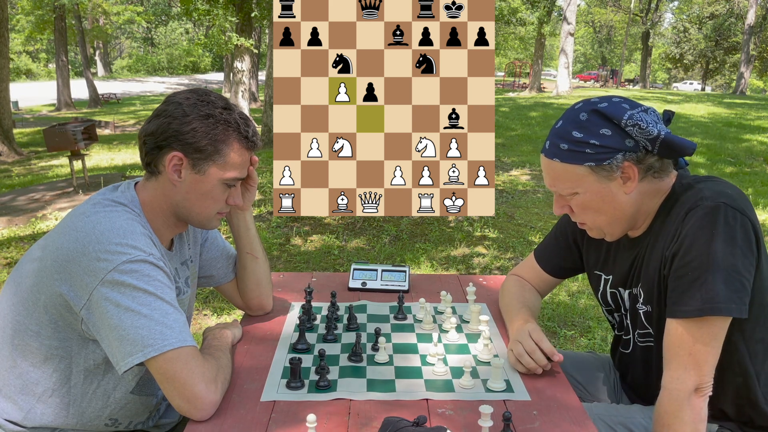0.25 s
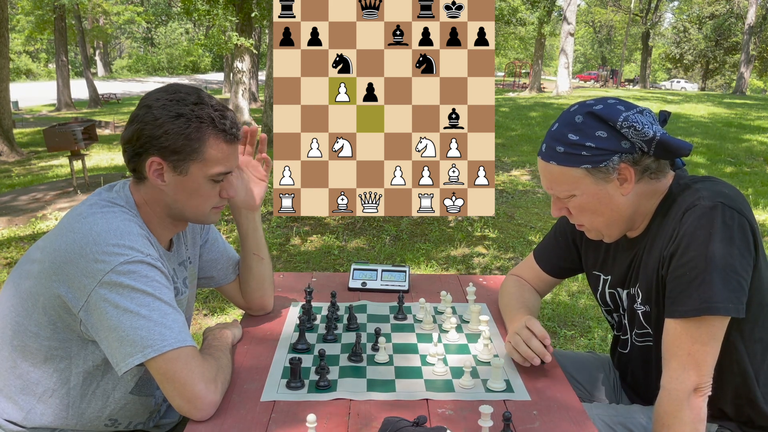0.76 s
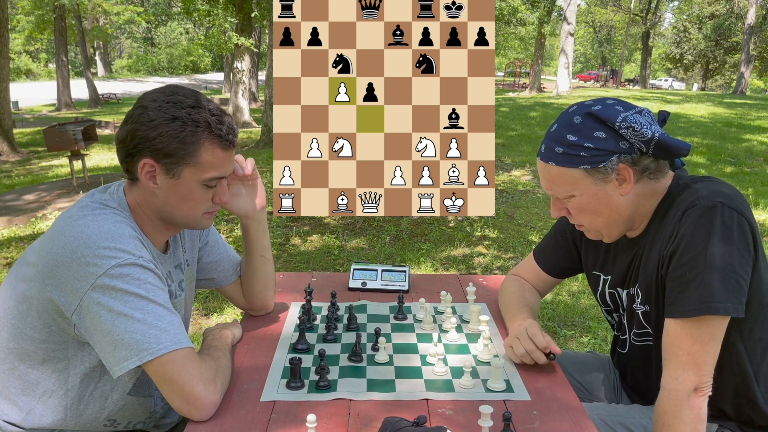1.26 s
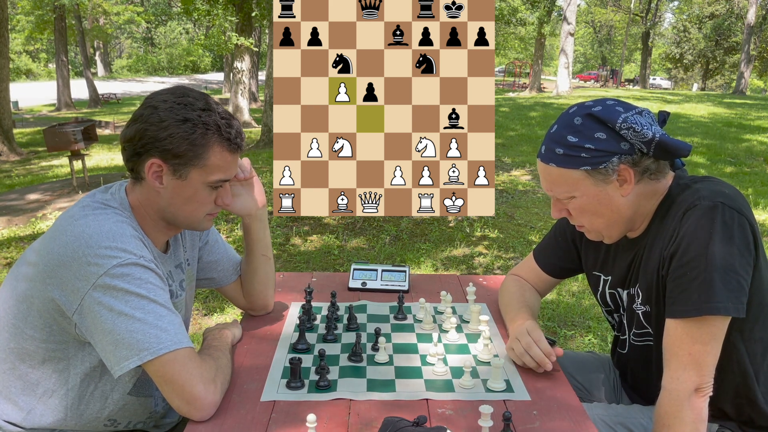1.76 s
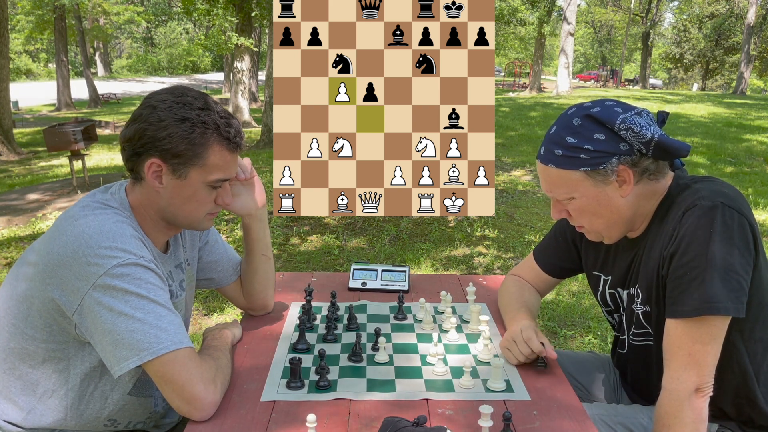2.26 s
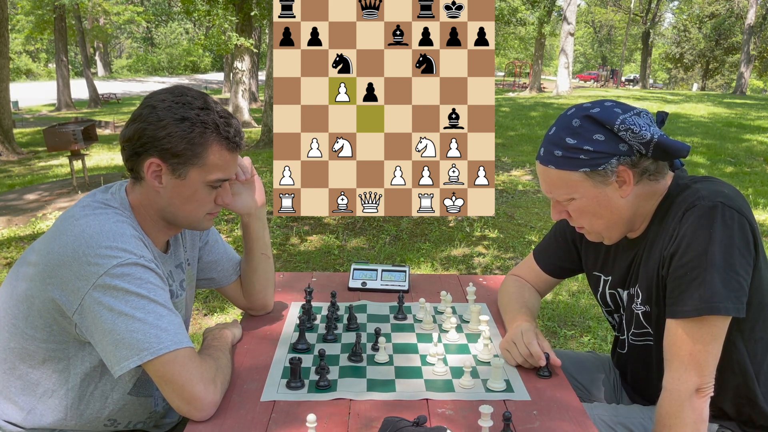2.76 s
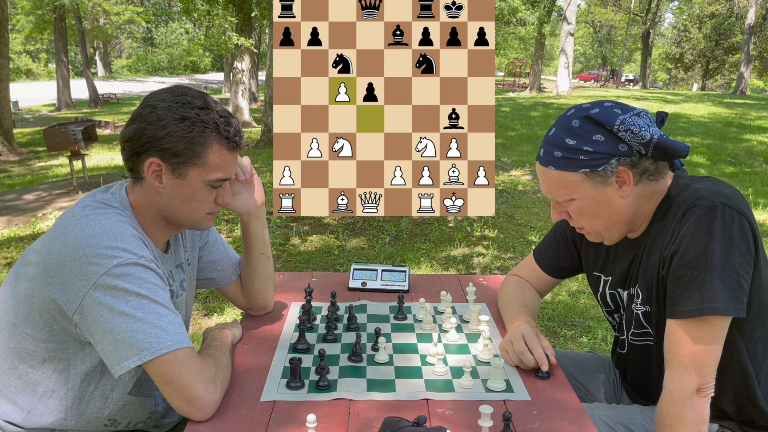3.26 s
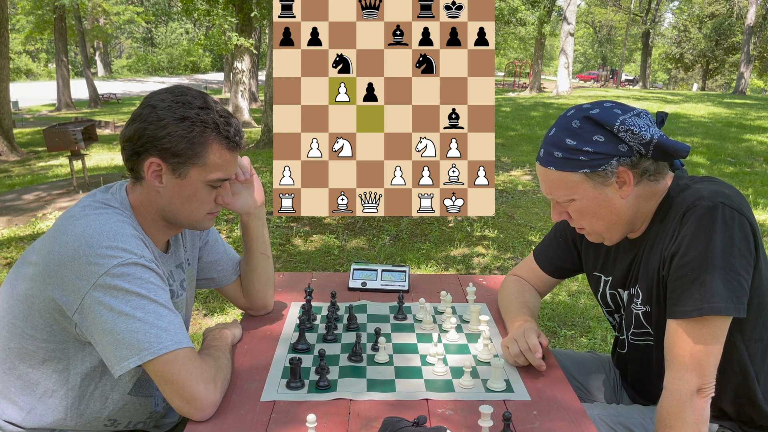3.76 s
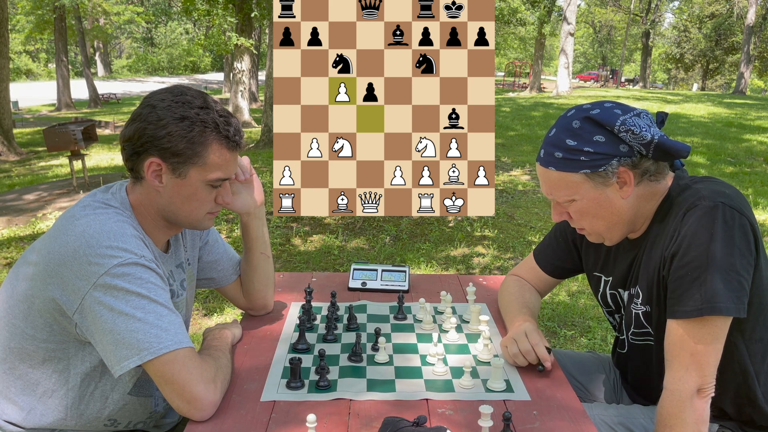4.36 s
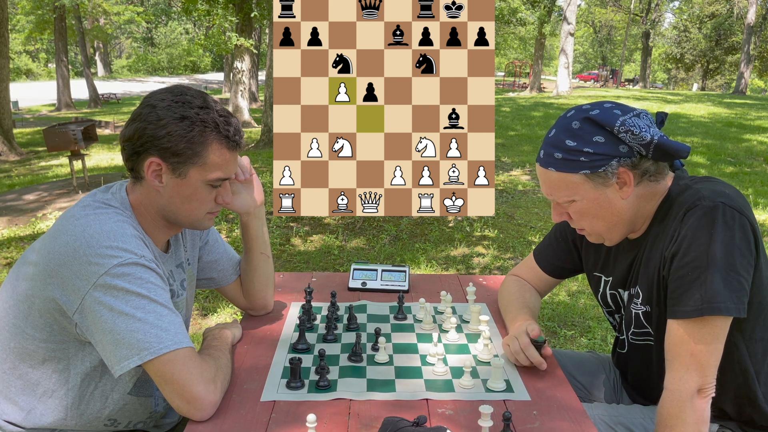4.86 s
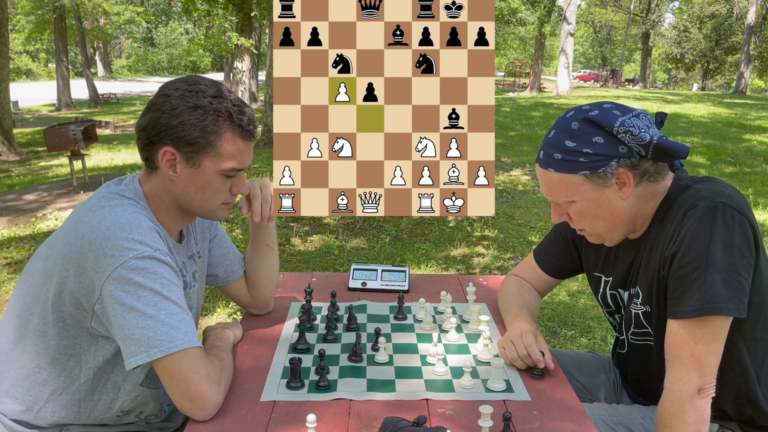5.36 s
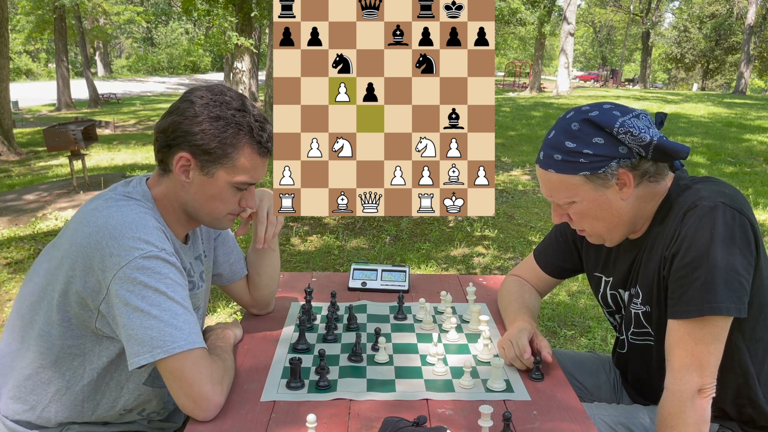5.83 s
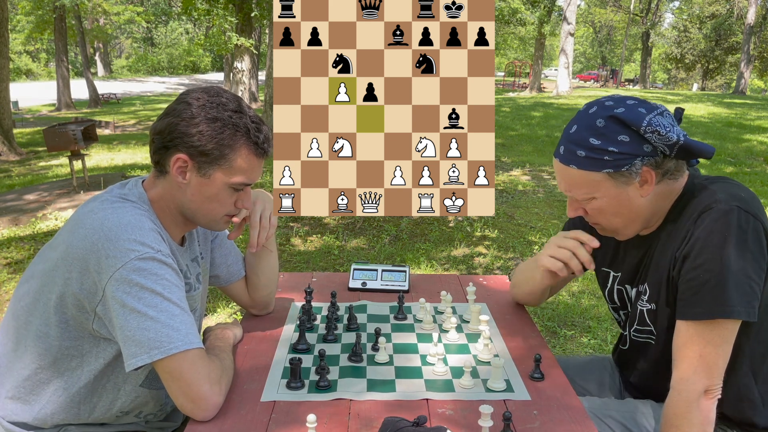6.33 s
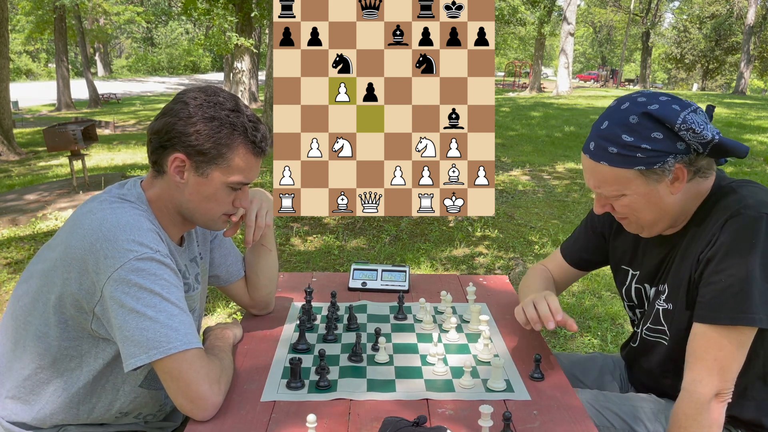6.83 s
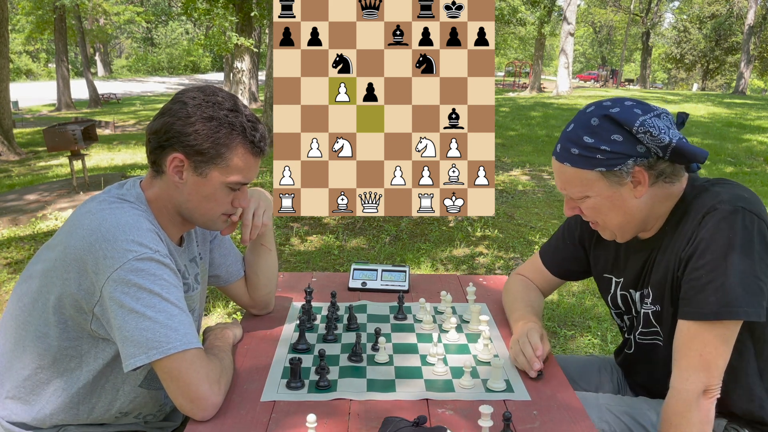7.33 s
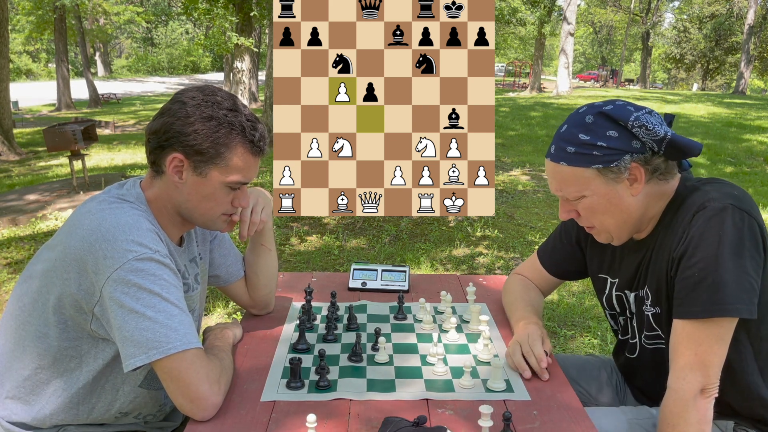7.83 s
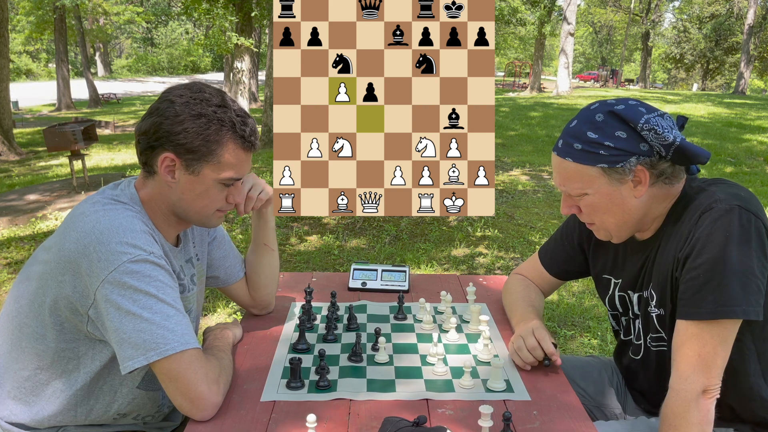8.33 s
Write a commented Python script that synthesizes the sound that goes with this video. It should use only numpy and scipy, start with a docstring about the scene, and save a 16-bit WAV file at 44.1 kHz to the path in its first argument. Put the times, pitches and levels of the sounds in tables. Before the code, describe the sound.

A calm outdoor park heard from beside a wooden table. Low wind rumble and distant traffic wash run throughout, with a low engine drone and thin, unsteady whine gradually fading. Bright, short bird whistles, falling, arching and trilled, are prominent from 0 to 1.7 s, lightly echoed by trees. At 0.54 s a hard plastic piece strikes the planks in a crisp, rapid double clack, the loudest event. Tiny ticks follow at 0.9, 1.6 and 2 s, the last with a faint bump. From 2.9 to 5 s a far bird repeats a falling slur about twice a second. A softer, woodier double clack comes at 5.32 s, surrounded by faint ticks. Very light finger brushes occur around 3.5, 6.2-6.6 and 7.4 s; dull bumps land at 7.04 and 7.34 s. Leaves hiss gently around 7.5 s amid quick, faint twittering, then sparse distant calls and tiny ticks to the end.

```python
"""Chess in the park

A player toys with a captured plastic piece at a wooden table. Twice it clacks on the planks:
each clack is a row of quick contacts that make the wood ring. Soft bumps ring the same wood.
In the fingers the piece ticks (short noise and ringing) and skin brushes cloth and wood (grainy noise).
Birds sing gliding tones, partly echoed by the trees. Shaped noise makes wind, far traffic and leaves.
A distant engine adds a drone of narrow noise and a thin, unsteady whine."""
import sys
import numpy as np
from scipy import signal
from scipy.fft import rfft, irfft
from scipy.io import wavfile

SR = 44100
rng = np.random.default_rng(int(sys.argv[2]) if len(sys.argv) > 2 else 0)


def master_out(mix):
    """Clip the mix to full scale and print it as 16-bit PCM to the path in sys.argv[1]."""
    frames = np.transpose(np.atleast_2d(mix))
    ceiling = np.clip(frames, -1, 1)
    pcm = np.round(ceiling * 32767).astype(np.int16)
    wavfile.write(sys.argv[1], SR, pcm)


N = 378819
TIME = np.arange(N) / SR

# how the planks and the piece ring when struck, at two spots on the table:
# (frequency [Hz], time to fall by 60 dB [s], relative level at spot 0 [dB], relative level at spot 1 [dB])
WOOD_MODES = [(364, 0.13, -24, -15.5), (433, 0.058, -16, -11), (533, 0.093, -11.5, -18),
              (711, 0.12, -21, -21), (760, 0.074, -45, -21), (975, 0.058, -16.5, -5),
              (1130, 0.029, -17, -19), (1140, 0.015, -34, -7), (1329, 0.026, 0.5, 0),
              (1650, .011, -25, -11.5), (1990, 0.013, -1.5, -7), (2000, 0.011, -18, -13.5),
              (2440, 0.018, -16, -16), (2460, 0.0066, 4.5, -24), (2990, 0.035, -8.5, -25),
              (4450, 0.013, -24, -32), (5100, 0.0035, -4.5, -16), (6000, 0.0099, -20.5, -23),
              (8540, 0.011, -16, -9), (12750, 0.0099, -7.5, -3)]
# the piece lands in two steps, rim then base:
# (time [s], relative level [dB], brightness [Hz], spot on the table [0 or 1], time between bounces [s])
CLACKS = [(.5440, -18, 6550, 0, 0.001798), (.55083, -18.5, 2570, 0, 0.001504),
          (5.3187, -22.5, 2830, 1, 0.00219), (5.3234, -25, 2130, 1, 0.0017)]
# soft bumps of hand and piece: (time [s], relative level [dB], brightness [Hz], spot on the table [0 or 1])
BUMPS = [(1.978, -50, 2000, 0), (5.224, -55, 2000, 1), (7.041, -35, 340, 1), (7.344, -38, 400, 0)]
BOUNCE_LOSS_DB, BOUNCE_DULLING = 3, 0.5  # each bounce is weaker and duller than the last
THUD_HZ, THUD_T60_S, THUD_DB = 107, 0.02, -5  # the whole table top gives under a blow

# how the held piece rings: (frequency [Hz], time to fall by 60 dB [s], relative level [dB])
PIECE_MODES = [(3510, 0.02, -7.5), (4080, 0.0053, -2), (8450, 0.02, -37)]
# small ticks of the piece in the fingers: (time [s], relative level [dB])
TICKS = [(.92, -47.5), (1.56, -45), (1.9793, -42), (4.2784, -56.5), (4.3798, -57), (5.2268, -48),
         (5.3406, -44.5), (8.2057, -53), (8.3706, -54)]
# fingers brushing cloth and wood: (time [s], length [s])
RUBS = [(3.546, 0.068), (6.165, 0.079), (6.283, 0.039), (6.5, 0.15), (7.328, .055), (7.473, .14)]
RUB_DB = -77

# pitch curve of each bird syllable at even steps: (multiple of the note's pitch [no unit])
PLUNGE_SHAPE = [1.13, 1.07, 1, .85, .68]
SWOOP_SHAPE = [1.2, 1.09, 1, .965, .955]
ARCH_SHAPE = [.79, .92, 1, 1, 1, .98, .8]
FLICK_SHAPE = [.87, 0.99, 1.11]
BURR_SHAPE = [1.06, 0.96, 0.89]
HOOK_SHAPE = [.96, 1, 1, .9, .77]
PIPE_SHAPE = [.975, 1, 1.015]
SLUR_SHAPE = [1.25, 1, .8]
# length of each syllable, in seconds
PLUNGE_S, SWOOP_S, ARCH_S, FLICK_S = 0.074, 0.1, 0.06, 0.02
BURR_S, HOOK_S, PIPE_S, SLUR_S = 0.12, 0.075, 0.085, 0.125
# whistles that fall ever faster: (time [s], pitch [Hz], relative level [dB])
PLUNGES = [(.166, 3256, -46), (1.15, 3280, -44.5), (7.003, 3030, -59.5), (7.487, 3250, -61.5)]
# whistles that fall and level out: (time [s], pitch [Hz], relative level [dB])
SWOOPS = [(1.626, 2903, -45.5), (2.715, 8440, -77.5), (4.155, 2150, -68), (5.32, 2880, -60.5),
          (5.475, 3440, -67.5), (8.24, 3450, -64), (8.38, 2890, -66), (8.47, 4180, -68.5)]
# whistles that rise, hold and drop: (time [s], pitch [Hz], relative level [dB])
ARCHES = [(.526, 3434, -44.5), (.591, 3520, -47.5)]
# quick upward flicks: (time [s], pitch [Hz], relative level [dB])
FLICKS = [(.511, 3100, -52.5), (1.49, 3400, -54.5), (1.511, 3110, -45)]
# low, trilled notes: (time [s], pitch [Hz], relative level [dB])
BURRS = [(.015, 2546, -54), (.997, 2610, -48.5), (1.5, 2513, -55.5)]
# whistles that hold, then hook down: (time [s], pitch [Hz], relative level [dB])
HOOKS = [(2.037, 4070, -63.5), (2.152, 3970, -68)]
# nearly level piping notes: (time [s], pitch [Hz], relative level [dB])
PIPES = [(.648, 2247, -56.5), (1.96, 4550, -67), (2.79, 2100, -67), (5.37, 8270, -74), (5.915, 2960, -69),
         (6.09, 2910, -66), (6.6, 2600, -65.5), (7.8, 2570, -64.5)]
# a far bird repeats one falling slur about twice a second: (time [s])
SLUR_TIMES = [2.884, 3.373, 3.9, 4.42, 4.99]
SLUR_HZ, SLUR_DB = 3795, -72
# a faint syllable comes from farther off, so less of it is heard directly:
# (level [dB], share of the direct sound kept [0 to 1])
DIRECT_BY_LEVEL = [(-69, .62), (-53, 0.91)]
BURR_TRILL_HZ, BURR_TRILL_DEPTH = 30.9, 0.056
FLUTTER_PITCH, FLUTTER_DB = 0.035, 4  # how much the pitch and level of a scattered note tremble

# colour of the park's air noise: (frequency [Hz], relative level per Hz [dB])
AIR = [(12, -24), (20, 7), (44, -4.5), (80, -1), (153, -10), (213, -13.5), (252, -22), (491, -24),
       (565, -24.5), (631, -21), (1070, -22.5), (2210, -31.5), (3450, -35.5), (7310, -51), (15500, -57)]
AIR_DB = -53.5
# swell of the wind rumble, before a small trim and waver: (time [s], level [dB])
WIND = [(0.0, -50), (1.22, -52.5), (3.25, -53.5), (3.61, -53), (5.98, -54), (8.59, -53)]
# wash of far traffic, before a small trim and waver: (time [s], level [dB])
TRAFFIC = [(0.0, -59.5), (0.96, -58), (2.2, -59), (4.06, -62.5), (8.59, -60.5)]
LEAVES_DB, GUST_AT_S, GUST_WIDTH_S, GUST_DB = -1, 7.55, 0.39, 6.5  # one gust stirs the leaves

# middle pitch of the far engine's whine, which sinks and then holds: (time [s], pitch [Hz])
WHINE = [(0.7, 685.7), (3.75, 646.5), (4.2, 644)]
WHINE_DB, WHINE_FADE_DB, WHINE_FADE_S = -65.5, 9.5, 1.7  # the whine settles to a lower level
DRONE_DB, DRONE_FADE_DB_PER_S = -54.5, 1.5

TOP_HZ = 15700  # upper limit of the treble


def undb(db):
    """Turn decibels into a gain."""
    return 10 ** (np.asarray(db) / 20)


def unit(x):
    """Scale to an average (rms) strength of 1."""
    return x / np.sqrt(np.mean(x ** 2))


def curves(table):
    """Draw straight lines through a timed table, one curve for each column after the time."""
    s, *columns = np.transpose(table)
    return [np.interp(TIME, s, column) for column in columns]


def add(track, s, sound):
    """Mix a sound into a track at time s."""
    i = max(int(s * SR), 0)
    track[i:i + len(sound)] += sound[:max(N - i, 0)]


def filtered(x, hz, kind, order=2):
    """Keep the low, middle or high part of a sound (Butterworth filter)."""
    edges_hz = np.minimum(hz, SR / 2 - 1)
    return signal.sosfilt(signal.butter(order, edges_hz, kind, fs=SR, output="sos"), x)


def noise(gain):
    """Noise of rms 1, coloured by gain(frequency)."""
    spectrum = rfft(rng.standard_normal(2 * 2 ** 18))
    hz = np.linspace(1, SR / 2, 2 ** 18 + 1)
    return unit(irfft(spectrum * gain(hz))[:N])


def walk(rate):
    """A random wander of rms 1, with about rate swings a second."""
    steps = 2 * rate * TIME
    return unit(np.interp(steps, np.arange(4096), rng.standard_normal(4096)))


def fade(t, t60):
    """Exponential decay that falls by 60 dB in t60 seconds."""
    return np.exp(-np.log(1000) * t / t60)


def ring(hz, t60, db):
    """The answer to one tap: a sum of sine tones that each die away."""
    t = TIME[:SR // 4]
    return sum(undb(d) * fade(t, life) * np.sin(2 * np.pi * f * t) for f, life, d in zip(hz, t60, db))


def trees(x, t60, delay):
    """Scattering among trunks and leaves: a noisy tail that builds up and dies away."""
    t = TIME[:SR]
    tail = rng.standard_normal(len(t)) * fade(t, t60) * (1 - np.exp(-t / delay))
    return signal.fftconvolve(x, tail / np.linalg.norm(tail))[:N]


def clacks():
    """Clacks and bumps ring the table; every contact excites the same modes, through its own dulling filter."""
    out = np.zeros(N)
    hz, t60, *spots = np.transpose(WOOD_MODES)
    thud = ring([THUD_HZ], [THUD_T60_S], [THUD_DB])
    frame = table_frame()
    answers = [ring(hz, t60, db) + thud + undb(-12) * frame for db in spots]
    contacts = [contact for clack in CLACKS for contact in chatter(*clack, count=3)]
    for s, db, bright_hz, spot in contacts + BUMPS:
        add(out, s, -undb(db) * filtered(answers[round(spot)], bright_hz, "low"))
    # open planks radiate little bass
    out = filtered(out, 276, "high", order=1)
    return out + undb(-31.5) * trees(out, t60=0.43, delay=0.025)


def chatter(s, db, bright_hz, spot, gap, count):
    """The contacts of one landing: a blow and its quick bounces, each weaker and duller."""
    return [(s + gap * k, db - BOUNCE_LOSS_DB * k, bright_hz / (1 + BOUNCE_DULLING * k), spot)
            for k in range(count)]


def table_frame():
    """The frame joins in a moment later; noise stands for its many weak, crowded resonances."""
    t = TIME[:SR // 4]
    crowd = unit(filtered(rng.standard_normal(len(t)), [300, 950], "band"))
    return crowd * fade(t, 0.079) * (1 - np.exp(-t / 0.0078))


def ticks():
    """Plastic ticks in the hand: a short crack of noise and the ring of the piece."""
    out, t = np.zeros(N), TIME[:SR // 4]
    piece = ring(*np.transpose(PIECE_MODES))
    for s, db in TICKS:
        crack = filtered(rng.standard_normal(len(t)), [900, 5000], "band", order=1) * fade(t, 0.0053)
        add(out, s, undb(db) * (crack / 2 + piece))
    return out


def rubs():
    """Brushing fingers: treble noise with a grainy level, swelling and sinking with each stroke."""
    out = np.zeros(N)
    brush = filtered(noise(np.ones_like), 4000, "high", order=1) * undb(2 * walk(120))
    for s, length in RUBS:
        stroke = np.sin(np.pi * np.clip((TIME - s) / length, 0, 1))
        out += undb(RUB_DB) * brush * stroke
    return out


def birds():
    """Gliding whistles; faint ones are more broken up and come more as echoes from the trees."""
    slurs = [(s, SLUR_HZ, SLUR_DB) for s in SLUR_TIMES]
    near, far = (sing(PLUNGES, PLUNGE_S, PLUNGE_SHAPE, direct=0.8)
                 + sing(SWOOPS, SWOOP_S, SWOOP_SHAPE, direct=0.83)
                 + sing(ARCHES, ARCH_S, ARCH_SHAPE, direct=0.72, swell=0.12)
                 + sing(FLICKS, FLICK_S, FLICK_SHAPE, direct=0.7)
                 + sing(BURRS, BURR_S, BURR_SHAPE, direct=0.52, trill=BURR_TRILL_DEPTH)
                 + sing(HOOKS, HOOK_S, HOOK_SHAPE, direct=0.54, swell=0.25)
                 + sing(PIPES, PIPE_S, PIPE_SHAPE, direct=0.83)
                 + sing(slurs, SLUR_S, SLUR_SHAPE, direct=0.41, swell=0.5))
    early_echo = trees(far, t60=0.2, delay=0.0035)
    late_echo = trees(near + far, t60=0.9, delay=0.0045)
    return 1.39 * near + 1.36 * early_echo + undb(-7.5) * late_echo


def sing(notes, length, shape, direct, trill=0, swell=1.0):
    """One kind of syllable at each note's pitch and level, as two tracks: heard directly, and scattered."""
    near, far = np.zeros((2, N))
    for s, hz, db in notes:
        share = np.clip(direct * np.interp(db, *np.transpose(DIRECT_BY_LEVEL)), 0, 1)
        buzz = 1.4 * (1 - share)
        note = undb(db) * whistle(length, hz * np.array(shape), buzz, trill, swell)
        add(near, s, share * note)
        add(far, s, (1 - share) * note)
    return np.array([near, far])


def whistle(length, glide_hz, buzz, trill=0, swell=0.97):
    """One gliding sine tone; buzz makes it flutter, trill adds small downward sweeps of pitch."""
    u = np.linspace(0, 1, int(length * SR))
    glide = np.interp(u, np.linspace(0, 1, len(glide_hz)), glide_hz)
    glide = glide * (1 - trill * signal.sawtooth(2 * np.pi * BURR_TRILL_HZ * length * u))
    # the flutter heads for a new random value 300 times a second
    flutter = np.interp(u * length * 300, np.arange(100), rng.uniform(-1.5, 1.5, 100))
    phase = 2 * np.pi * np.cumsum(glide * (1 + FLUTTER_PITCH * buzz * flutter)) / SR
    # a small swell starts and ends the note abruptly
    loudness = undb(FLUTTER_DB * buzz * flutter) * np.abs(np.sin(np.pi * u)) ** swell
    return loudness * np.sin(phase)


def chorus():
    """Birds deep in the park: scattered calls, a brief cluster of overlapping whistles and a quick, low twitter."""
    scattered = twitter(0, 8.5, db=-75, length=0.036, low_hz=2530, octaves=1.0, count=56)
    # the whistles crowd into a tenth of a second, placed from the last to the first
    cluster = twitter(5.8, 5.7, db=-74, length=0.042, low_hz=2940, octaves=0.49, count=14)
    quick = twitter(7.15, 7.85, db=-77.5, length=0.021, low_hz=2640, octaves=0.6, count=44)
    calls = scattered + cluster + quick
    return 0.5 * calls + 1.1 * trees(calls, t60=0.18, delay=0.0047)


def twitter(start, end, db, length, low_hz, octaves, count):
    """Faint chirps spread loosely between two times, random in pitch, length and glide; higher is weaker."""
    out = np.zeros(N)
    for k, (when, pitch, span, slope) in enumerate(rng.random((count, 4))):
        s = start + (end - start) * (k + when) / count
        hz = low_hz * 2 ** (octaves * pitch ** 2)
        glide_hz = hz * (1 + (slope - 0.4) * np.array([0.2, 0, -0.16]))
        add(out, s, undb(db - 4 * pitch) * whistle(length * (0.5 + span), glide_hz, 0.5))
    return out


def park():
    """One noise, coloured like outdoor air, is split by pitch into wind, traffic, leaves and a steady rest."""
    hz, db = np.transpose(AIR)
    air = undb(AIR_DB) * noise(lambda f: undb(np.interp(np.log(f), np.log(hz), db)))
    low, middle, high = [below(air, edge_hz) for edge_hz in (220, 2400, 8000)]
    return wind(low) + traffic(middle - low) + leaves(high - middle) + air - high


def below(x, edge_hz):
    """Keep what lies below an edge; filtering forwards and backwards avoids any time shift."""
    backwards = filtered(x, edge_hz, "low")[::-1]
    return filtered(backwards, edge_hz, "low")[::-1]


def wind(band):
    """Wind rumble: the lowest noise, swelling slowly with a slight waver."""
    level_db, = curves(WIND)
    return unit(band) * undb(level_db + 1.0 + 0.4 * walk(4.7))


def traffic(band):
    """Far traffic: a wash of middle noise with its own swell and waver."""
    level_db, = curves(TRAFFIC)
    return unit(band) * undb(level_db - 0.65 + 0.5 * walk(6))


def leaves(band):
    """Leaves hiss in the treble noise and swell once in a gust."""
    gust_db = GUST_DB * np.exp(-((TIME - GUST_AT_S) / GUST_WIDTH_S) ** 2)
    return band * undb(LEAVES_DB + gust_db + walk(8))


def hum():
    """A distant engine draws away: its whine and its drone both fade."""
    return engine_whine() + engine_drone()


def engine_whine():
    """A thin sine tone that sinks, with a restless pitch and level."""
    hz, = curves(WHINE)
    tone = unit(np.sin(2 * np.pi * np.cumsum(hz + 22 * walk(39.6)) / SR))
    level_db = WHINE_DB - WHINE_FADE_DB * (1 - np.exp(-TIME / WHINE_FADE_S))
    return undb(level_db) * undb(2 * walk(25)) * tone


def engine_drone():
    """An unsteady low drone: noise in a narrow peak around 72 Hz."""
    drone = noise(lambda f: 1 / (1 + ((f - 72) / 6) ** 2))
    return undb(DRONE_DB - DRONE_FADE_DB_PER_S * TIME) * drone


def scene():
    """The table close by, the park all around."""
    table = clacks() + ticks() + rubs()
    surroundings = birds() + chorus() + park() + hum()
    return (table + surroundings)[None]


def record(dry):
    """A steep low-pass filter cuts the top of the treble."""
    return signal.sosfilt(signal.ellip(8, 0.2, 70, TOP_HZ, fs=SR, output="sos"), dry)


dry = scene()
out = record(dry)
master_out(out)
```